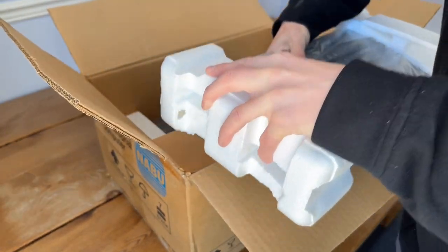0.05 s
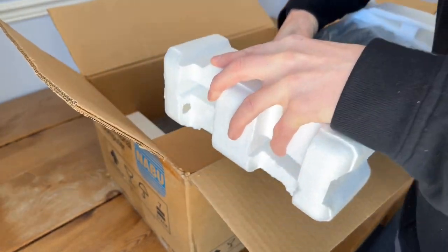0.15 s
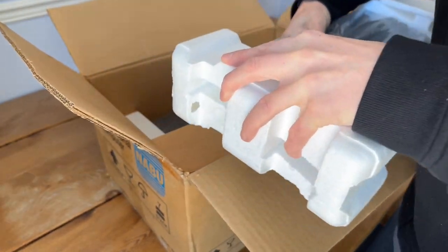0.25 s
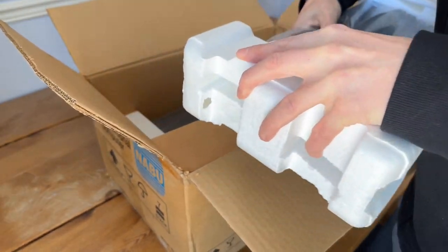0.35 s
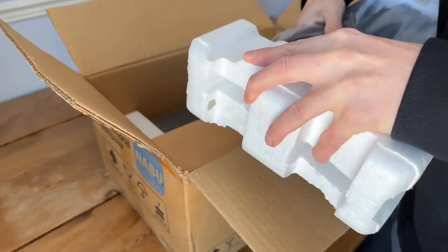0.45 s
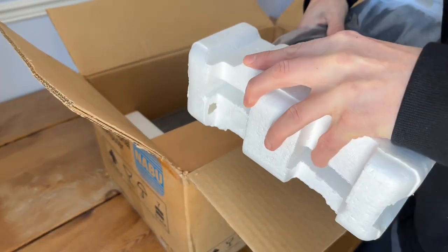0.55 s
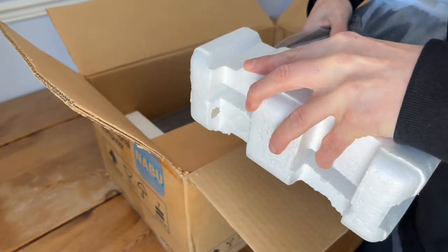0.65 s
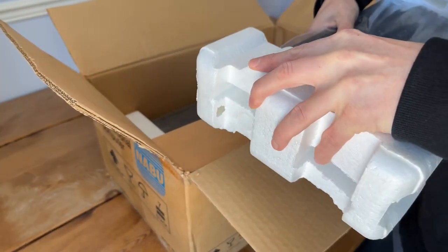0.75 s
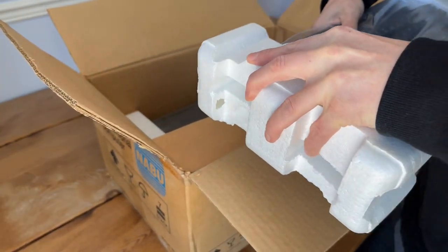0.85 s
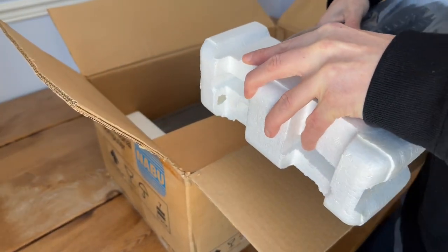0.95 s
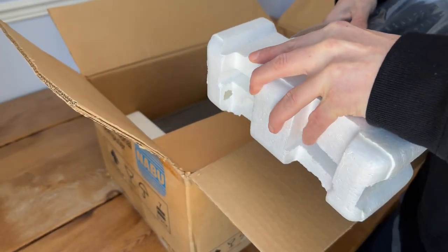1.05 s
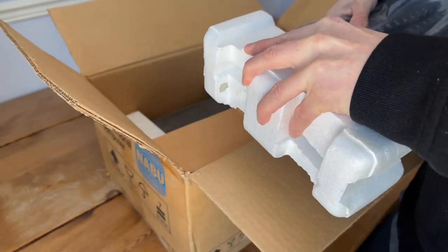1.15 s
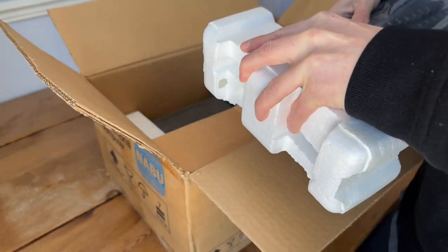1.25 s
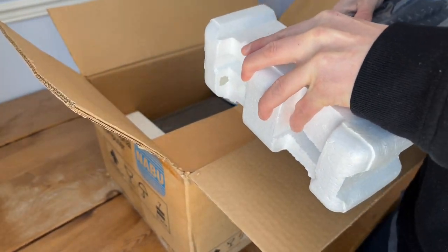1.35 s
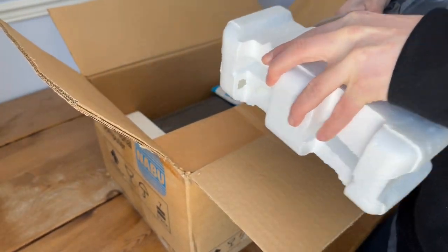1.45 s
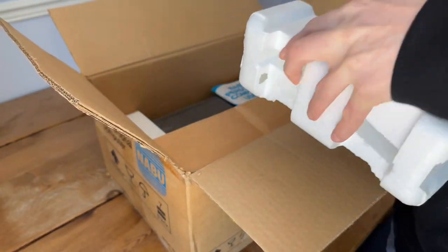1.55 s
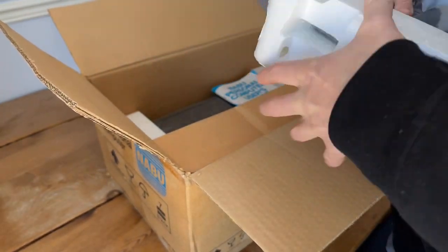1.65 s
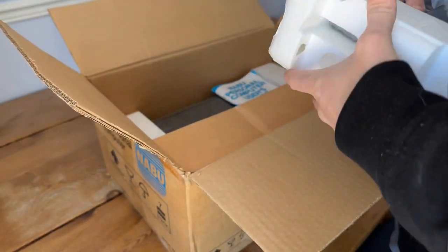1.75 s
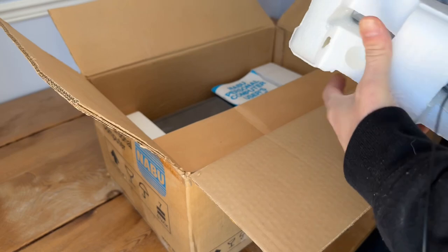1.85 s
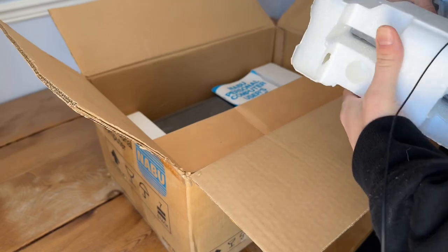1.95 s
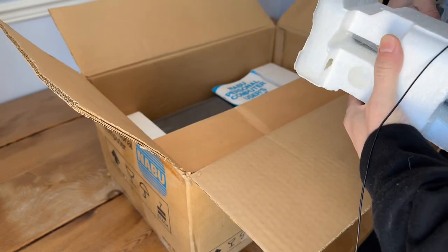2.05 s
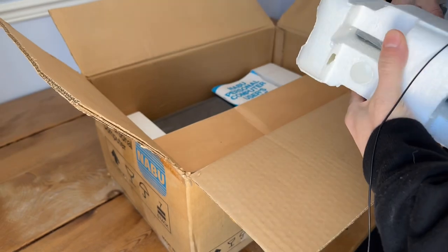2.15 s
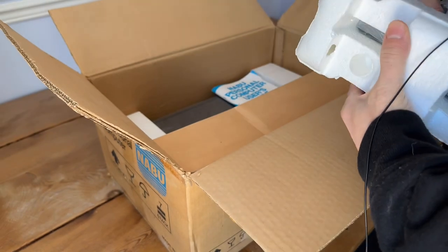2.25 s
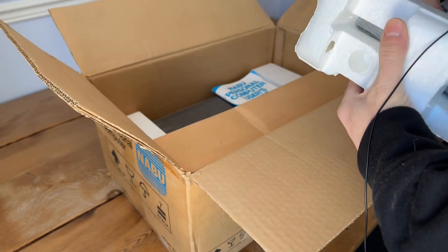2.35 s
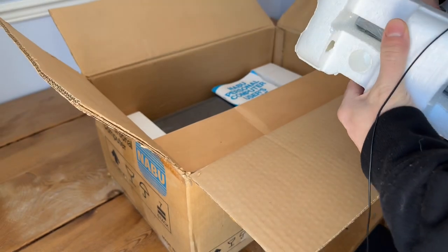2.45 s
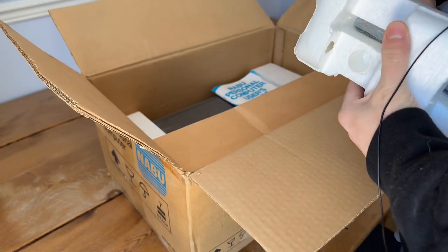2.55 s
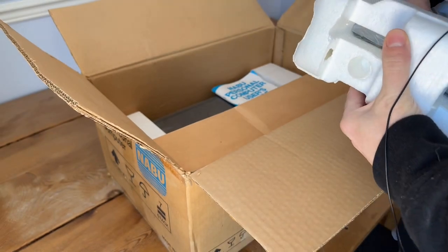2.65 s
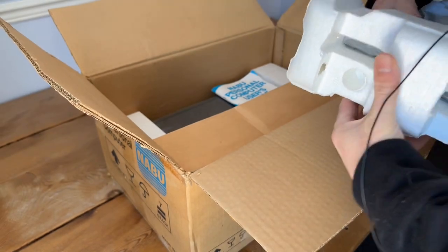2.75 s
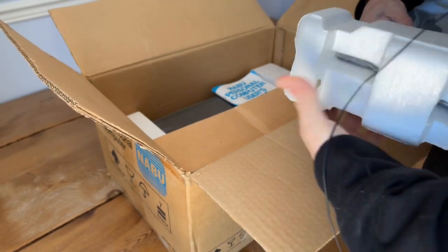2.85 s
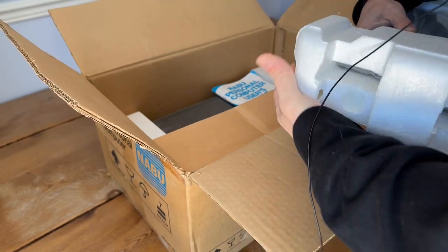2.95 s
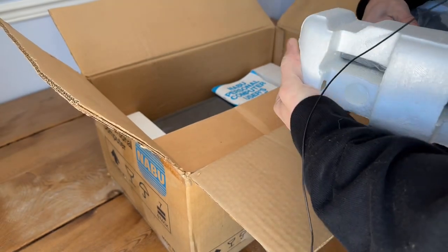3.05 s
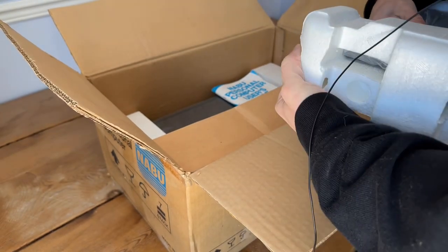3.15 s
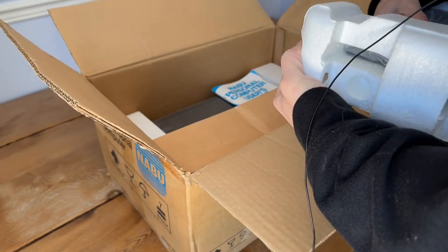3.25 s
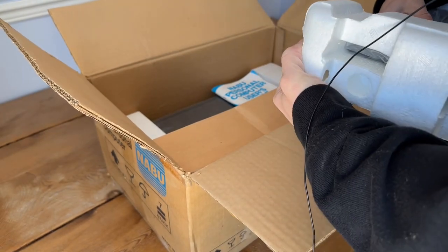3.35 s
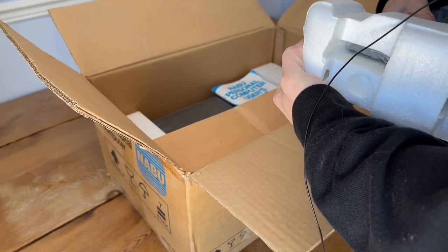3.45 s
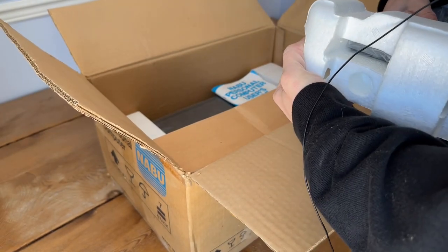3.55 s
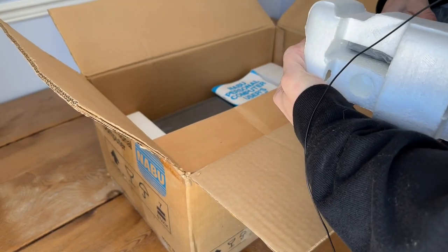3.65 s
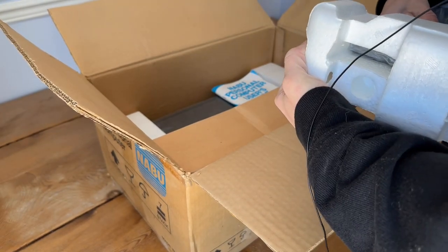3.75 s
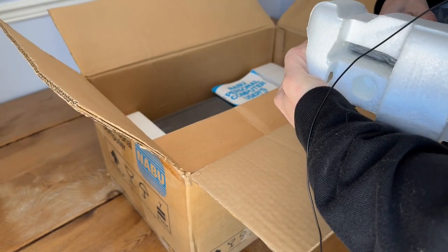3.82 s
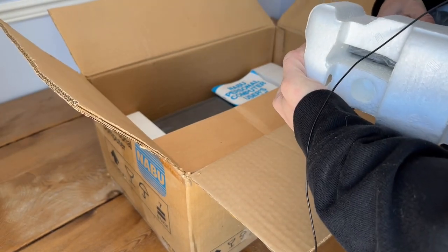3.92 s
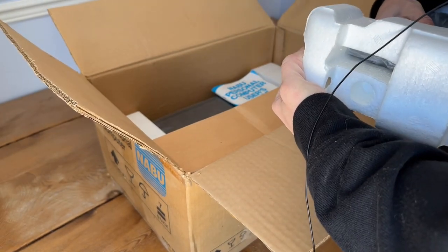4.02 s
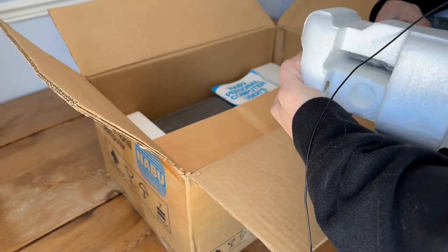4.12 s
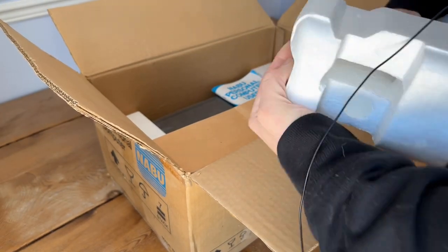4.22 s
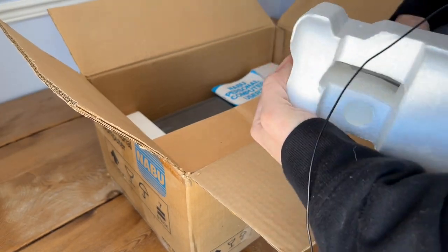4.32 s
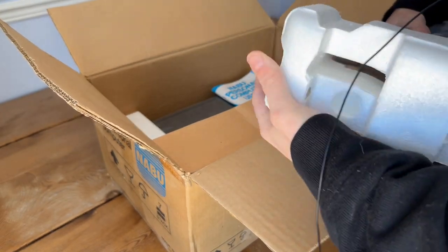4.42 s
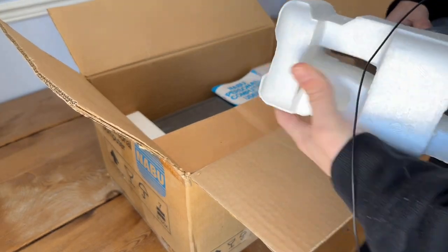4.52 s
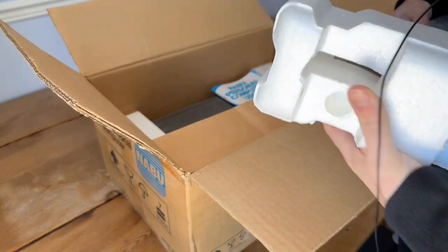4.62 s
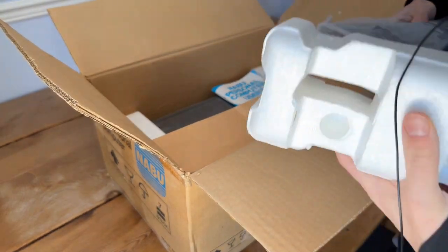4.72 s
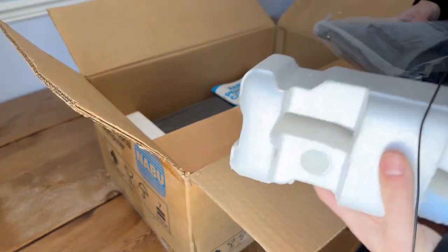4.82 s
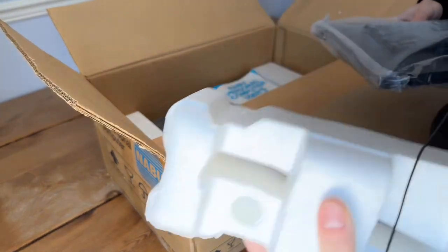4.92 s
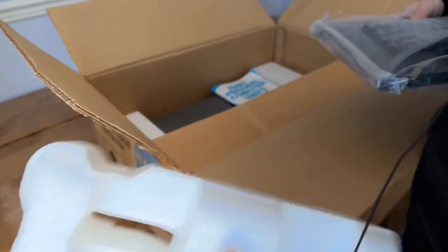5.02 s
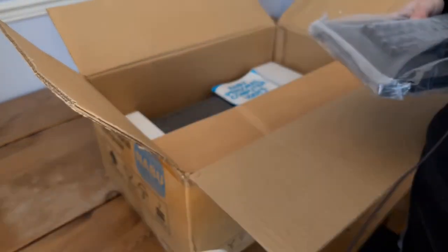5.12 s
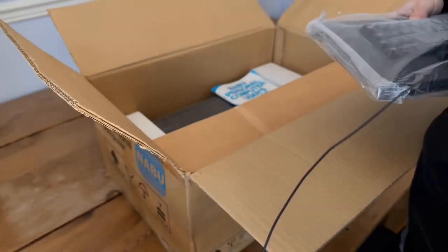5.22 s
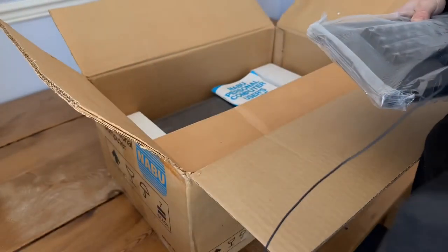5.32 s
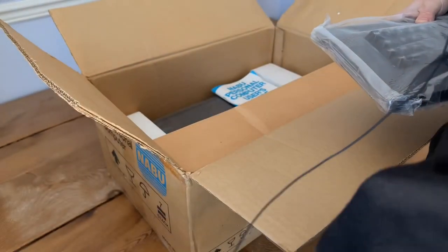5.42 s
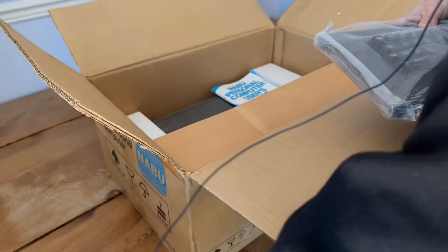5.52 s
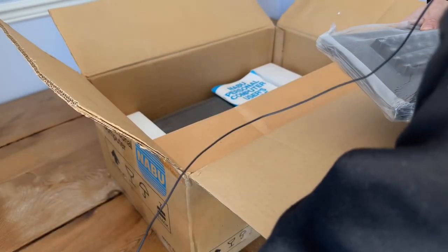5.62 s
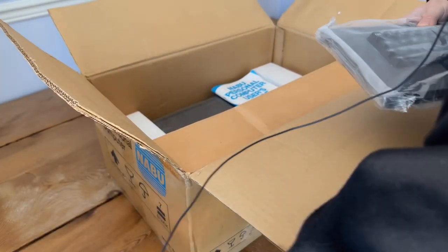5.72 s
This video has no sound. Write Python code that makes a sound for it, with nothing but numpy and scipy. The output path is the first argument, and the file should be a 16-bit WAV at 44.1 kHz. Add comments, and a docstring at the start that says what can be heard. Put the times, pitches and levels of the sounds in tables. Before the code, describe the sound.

Polystyrene foam scrapes and hisses against a crinkling plastic bag in small jerky pulls, with ticks, soft thumps and one sharp hollow knock.

```python
"""Dense tiny slips of foam and film scrape as a polystyrene end cap is worked off a device in a plastic bag,
over an open cardboard box in a small room: filtered noise and random grains follow the pulls of the hands.
Creases snap as noise bursts, film wrinkles pop, and single panels groan as damped resonances.
The hollow foam thumps under the hands and knocks as it jerks loose, each contact a push that rings modes;
then it slides off the bag and is put aside. Dull rubbing and quiet room air lie beneath."""
import sys
import numpy as np
from scipy import signal
from scipy.fft import rfft, irfft, next_fast_len
from scipy.io import wavfile
from scipy.ndimage import uniform_filter1d, map_coordinates

SR = 44100
rng = np.random.default_rng(int(sys.argv[2]) if len(sys.argv) > 2 else 0)


def dump_mix(stems):
    """Bounce the given channels to the path in sys.argv[1] as a 16-bit WAV at rate SR."""
    frames = np.atleast_2d(stems).T  # one column per channel
    limited = np.clip(frames, -1, 1)  # hard clip at full scale
    pcm = np.round(limited * 32767).astype(np.int16)
    wavfile.write(sys.argv[1], SR, pcm)


N = 254671


def amp(db):
    """Decibels to gain."""
    return 10 ** (np.asarray(db) / 20)


def unit(x):
    """Scale to rms 1."""
    return x / np.sqrt(np.mean(x ** 2) + 1e-20)


def along(points, hz):
    """Interpolate (Hz, value) points on a log frequency axis."""
    point_hz, value = np.transpose(points)
    return np.interp(np.log(hz + 1), np.log(point_hz + 1), value)


def decay(t, t60):
    """Exponential decay that falls 60 dB in t60."""
    return np.exp(-np.log(1000) * t / t60)


def swell(s, spread):
    """Bell-shaped gain around time s; spread is its standard deviation in seconds."""
    return np.exp(-.5 * ((np.arange(N) / SR - s) / spread) ** 2)


def envelope(start, length, attack, t60):
    """Linear attack, hold until the length is over, exponential release."""
    t = np.arange(N) / SR - start
    return np.clip(t / attack, 0, 1) * decay(np.maximum(t - length, 0), t60)


def wobble(rate):
    """A smooth random curve with rate knots a second."""
    knots = rng.standard_normal(4096)
    return map_coordinates(knots, [np.arange(N) * rate / SR], mode="wrap")


def add(track, s, sound):
    """Mix a sound in at time s."""
    part = track[max(0, round(s * SR)):][:len(sound)]
    part += sound[:len(part)]


def colour(x, spectrum, size=4096):
    """Minimum-phase filter of energy 1, its shape given by (Hz, dB) points."""
    log_gain = np.log(amp(along(spectrum, np.fft.rfftfreq(size, 1 / SR))))
    cepstrum = irfft(log_gain)
    # folding the cepstrum forward in time makes the filter causal
    cepstrum[1:size // 2] *= 2
    cepstrum[size // 2 + 1:] = 0
    response = irfft(np.exp(rfft(cepstrum)))
    return signal.fftconvolve(x, response / np.linalg.norm(response))[:len(x)]


def slips(rate, spread_db, smooth):
    """Random tiny slips of uneven size, rate a second, on a bed of smooth friction noise."""
    chance, size, sign = rng.random(N), rng.standard_normal(N), rng.standard_normal(N)
    grains = (chance < rate / SR) * np.sign(sign) * amp(spread_db * np.clip(size, -2, 2))
    return unit(unit(grains) + smooth * rng.standard_normal(N))


def flex(x, depth_db, size=1024):
    """Resonances come and go as the sheet bends: a smoothed random gain over time and pitch."""
    z = signal.stft(x, nperseg=size)[2]
    field = uniform_filter1d(rng.standard_normal(z.shape), size=4, axis=0)
    field = uniform_filter1d(field, size=5, axis=1)
    flexed = signal.istft(z * amp(depth_db * unit(field)), nperseg=size)[1]
    return unit(flexed[:N])


def room(x, wet_db):
    """Table, box flaps and walls answer with a noise tail, drawn anew each quarter second as the load moves."""
    # Each row: frequency in Hz, t60 in seconds.
    tail_t60 = [(100, 0.12), (400, 0.16), (1000, 0.091), (4000, 0.091), (15000, 0.099)]
    out, hop = np.zeros(N), SR // 4
    for start in range(0, N, hop):
        hz, t, z = signal.stft(rng.standard_normal(SR // 3), SR, nperseg=256)
        tail = signal.istft(z * decay(t, along(tail_t60, hz)[:, None]), SR, nperseg=256)[1]
        answer = signal.fftconvolve(x[start:start + hop], tail / np.linalg.norm(tail))
        add(out, start / SR + .0025, answer)
    return (x + amp(wet_db) * out) / np.hypot(1, amp(wet_db))


def scraping(hiss_gain, rasp_gain, lift):
    """Foam beads catch and slip: a bright hiss, with a coarser rasp from the bag."""
    # Short jerks of the foam, levels ahead of the layer trims.
    # Each row: peak in seconds, hiss level in dB, rasp level in dB, spread in seconds.
    jerks = [(0.251, -57, -40.5, 0.0066), (0.315, -55, -56, 0.006), (.65, -43, -59, 0.0022),
             (.931, -39, -48, 0.0055), (0.958, -44.5, -53, 0.004), (0.987, -45.5, -52, 0.0038),
             (1.511, -33, -46, 0.0058), (1.522, -32.5, -48, 0.0045), (1.659, -36, -38, 0.0018),
             (3.121, -52, -58, 0.0034), (4.188, -42, -32.5, 0.0045), (4.198, -36, -36, 0.0072),
             (4.235, -53, -32.5, 0.0038), (4.243, -36.5, -36, 0.0052), (4.659, -44.5, -63, 0.011),
             (5.537, -34, -63, 0.0023)]
    # Colour of the bead hiss. Each row: frequency in Hz, relative level in dB.
    hiss_spectrum = [(200, -86), (600, -26.5), (1200, -8), (2400, -9), (3300, -11), (4000, -7), (5200, -6),
                     (8000, -6), (10400, -7), (12500, -3.5), (14700, 1.5), (16000, -6.5)]
    # Colour of the crumpling bag. Each row: frequency in Hz, relative level in dB.
    rasp_spectrum = [(150, -44), (350, -17), (520, -2), (760, 3.5), (1000, 0), (1200, -2), (1550, -4),
                     (2100, -5.5), (3000, -9.5), (6000, -15), (16000, -53)]
    for s, hiss_db, rasp_db, spread in jerks:
        jerk = swell(s, spread)
        hiss_gain = hiss_gain + amp(hiss_db) * jerk
        rasp_gain = rasp_gain + amp(rasp_db) * jerk
    hiss = colour(slips(rate=5000, spread_db=4.5, smooth=0.78), hiss_spectrum)
    hiss = flex(hiss, depth_db=1.7)
    # a tight contact trades the lower hiss for the top octave
    high_pass = signal.butter(2, 10500, "high", fs=SR, output="sos")
    top = signal.sosfiltfilt(high_pass, hiss)
    hiss = (hiss - top + lift * top) / np.sqrt((1 + lift ** 2) / 2)
    rasp = colour(slips(rate=700, spread_db=3.0, smooth=0.58), rasp_spectrum)
    rasp = flex(rasp, depth_db=3.5)
    return room(amp(0.34) * hiss_gain * hiss + amp(-3.5) * rasp_gain * rasp, wet_db=-11)


def friction():
    """Gains of hiss, rasp and top octave: the pulls add their power to the light contact."""
    # Pulls of the foam along the bag, levels ahead of the layer trims.
    # Each row: start in seconds, length in seconds, hiss level in dB, rasp level in dB,
    # growth over the pull in dB, top-octave lift in dB.
    pulls = [(0.116, 0.081, -51, -53.5, 10, -1), (0.275, 0.14, -57, -62.5, -15, -1),
             (0.716, 0.069, -58, -57, 6, -3), (0.908, .11, -52.5, -53, 1, 1.5),
             (1.044, 0.13, -56, -66, -6, 1.5), (1.261, 0.056, -52.5, -58.5, -5, 2),
             (1.338, .15, -48, -51, 8, 2.5), (1.494, 0.07, -40, -49.5, 1, 7),
             (1.653, .14, -39, -52, -6.5, 5), (1.863, 0.071, -37, -52.5, -2.5, 3),
             (1.987, 0.047, -43, -48, 7.5, -1), (2.25, .075, -53.5, -54, 2.5, -2),
             (2.638, 0.091, -42, -48, 10, 0.5), (2.78, 0.097, -38.5, -52, -3, 1.5),
             (2.943, .027, -38, -44, -4, 6.5), (3.05, 0.051, -44, -53, -4, 1),
             (4.108, 0.046, -51.5, -55, 13, -1), (4.151, 0.11, -36.5, -36, -3, -2),
             (4.365, 0.32, -37.5, -52, 5.5, -1), (4.689, 0.053, -43, -47, -4, 1),
             (4.743, .12, -54, -49.5, -5, 10), (5.066, 0.068, -56, -71, 8, -8),
             (5.253, 0.035, -45, -51.5, -0.5, -5), (5.423, 0.063, -44.5, -60, 10, -11),
             (5.535, 0.036, -39.5, -45, -12, -2), (5.63, 0.049, -41.5, -42.5, 19, -11)]
    attack_s, release_t60_s = 0.017, 0.13  # a pull takes hold, and dies away when the hands stop
    lift_per_db = .5  # dB of top-octave lift for each dB that a pull grows
    touch_hiss_db, touch_rasp_db = -0.5, 0.5  # share of the light contact in each layer
    treble, mids = touch()
    hiss_power = (amp(touch_hiss_db) * treble) ** 2
    rasp_power = (amp(touch_rasp_db) * mids) ** 2
    weighted_lift_db = np.zeros(N)
    for start, length, hiss_db, rasp_db, growth_db, lift_db in pulls:
        progress = np.clip((np.arange(N) / SR - start) / length, 0, 1)
        effort_db = growth_db * (progress - .5)
        power = (amp(effort_db) * envelope(start, length, attack_s, release_t60_s)) ** 2
        hiss_power = hiss_power + amp(hiss_db) ** 2 * power
        rasp_power = rasp_power + amp(rasp_db) ** 2 * power
        pull_lift_db = lift_db + lift_per_db * effort_db
        weighted_lift_db = weighted_lift_db + amp(hiss_db) ** 2 * power * pull_lift_db
    uneven = amp(1.0 * wobble(rate=70))  # dB; the grip is never quite even
    lift = amp(weighted_lift_db / hiss_power)
    return uneven * np.sqrt(hiss_power), uneven * np.sqrt(rasp_power), lift


def touch():
    """Treble and mids gains of the light contact between pulls, which dips when the hands pause."""
    # Levels of the light contact ahead of each layer's share, joined by straight lines.
    # Each row: time in seconds, treble level in dB, mids level in dB.
    contact = [(0.0, -56.5, -58.5), (0.24, -55, -55.5), (0.66, -62.5, -57), (1.36, -63, -61),
               (1.62, -56, -53), (2.26, -61, -59), (2.57, -57.5, -56), (2.88, -46, -58.5), (3.09, -58, -62),
               (3.34, -66, -60.5), (3.55, -71.5, -73), (3.86, -71.5, -67.5), (4.08, -61, -57),
               (4.58, -44, -58.5), (4.71, -59, -53), (4.85, -55.5, -56), (5.4, -54.5, -62.5),
               (5.77, -54, -47)]
    # Moments when the hands stop. Each row: middle in seconds, spread in seconds.
    pauses = [(0.583, 0.035), (0.856, 0.014), (1.243, 0.025), (1.856, 0.0092), (3.032, 0.0071),
              (3.7, 0.035), (5.363, 0.015)]
    pause_db = -5
    s, treble_db, mids_db = np.transpose(contact)
    rest_db = pause_db * sum(swell(middle, spread) for middle, spread in pauses)
    return [amp(np.interp(np.arange(N) / SR, s, db) + rest_db) for db in (treble_db, mids_db)]


def crinkles(firmness):
    """Small wrinkles of the bag pop at random, each with its own pitch, louder under firmer crumpling."""
    out, t = np.zeros(N), np.arange(SR // 50) / SR
    rate = 55  # pops a second
    for length, pitch, size, life in rng.standard_normal((int(rate * N / SR), 4)):
        s = rng.random() * N / SR
        hz = np.clip(2300 * np.exp(.6 * pitch), 500, 9000)
        sheet = np.sin(2 * np.pi * hz * t) * decay(hz * t, 5 * np.exp(0.25 * life))
        shiver = rng.standard_normal(len(t)) * decay(t, 0.012 * np.exp(0.43 * length))
        pop = unit(signal.fftconvolve(shiver, sheet)[:len(t)])
        add(out, s, amp(7.2 * np.clip(size, -2, 1.5)) * pop)
    # a taut film has few wrinkles left, so the level saturates
    firmness = firmness / (1 + firmness / amp(-52.0))
    return room(amp(-8) * firmness * unit(out), wet_db=-1)


def snaps():
    """A crease flips within 2 ms; the sheet around it shivers and the foam answers with a tock."""
    # Creases snapping and fingers ticking on foam, levels ahead of the layer trims.
    # Each row: start in seconds, treble level in dB, tock level in dB, tock pitch in Hz.
    creases = [(.522, -43, -46.5, 720), (.535, -54, -52, 900), (.618, -49, -51, 910),
               (.637, -39, -50.5, 596), (0.708, -45.5, -50, 940), (1.021, -64, -49, 2630),
               (1.142, -37.5, -50.5, 900), (2.069, -39, -52, 700), (2.115, -47.5, -43, 1730),
               (2.223, -52, -42.5, 650), (2.641, -59, -44.5, 716), (3.114, -41, -48.5, 1640),
               (3.199, -49, -45.5, 680), (3.243, -56, -48, 694), (3.310, -49, -66, 700),
               (3.326, -50, -56, 700), (3.354, -33, -46, 805), (3.408, -43, -53, 840),
               (3.441, -49.5, -58, 880), (3.534, -41, -49, 1220), (3.587, -50, -52, 1410),
               (3.844, -69, -41.5, 900), (3.899, -48, -49.5, 880), (3.940, -41, -50, 1070),
               (3.994, -49, -51, 1170), (4.023, -44, -49.5, 800), (4.062, -51, -49, 600),
               (4.101, -40, -58, 1000), (4.118, -42, -40, 577), (5.009, -48.5, -42.5, 2440)]
    # Colour of the crack. Each row: frequency in Hz, relative level in dB.
    crack_spectrum = [(200, -37), (1200, -17), (2800, -1.5), (5500, 3), (9500, 0), (14000, 3.5), (16000, 3)]
    # Colour of the tock at a pitch of 750 Hz. Each row: frequency in Hz, relative level in dB.
    tock_spectrum = [(80, -18), (300, -1.5), (750, 1.5), (1200, -7), (2500, -13.5), (4000, -24.5),
                     (16000, -23)]
    # the harder a snap, the less of it is shiver
    shiver_db, shiver_per_db, middling_snap_db = -0.5, -0.54, -44
    out, t = np.zeros(N), np.arange(SR // 10) / SR
    for s, treble_db, tock_db, tock_hz in creases:
        flip_noise, shiver_noise, tock_noise = rng.standard_normal((3, len(t)))
        shiver = unit(shiver_noise * decay(t, 0.018) * (1 - np.exp(-t / 0.0023)))
        flip = unit(flip_noise * decay(t, 0.002))
        crack = flip + amp(shiver_db + shiver_per_db * (treble_db - middling_snap_db)) * shiver
        crack = unit(colour(crack, crack_spectrum))
        body = [(hz * tock_hz / 750, db) for hz, db in tock_spectrum]  # slides to this tock's pitch
        tock = unit(colour(tock_noise * decay(t, 0.033), body))
        add(out, s, amp(treble_db - 15.0) * crack + amp(tock_db - 14.0) * tock)
    return room(out, wet_db=-9.0)


def knocks():
    """Hard knocks ring the stiff foam block and crush beads as the foam jerks loose."""
    # Each row: start in seconds, level in dB, contact pitch in Hz, ring level in dB.
    hits = [(4.2432, -17, 1030, -30), (5.688, -34, 645, -14.5)]
    # Stiff ring of the foam block. Each row: frequency in Hz, relative level in dB, t60 in seconds.
    block_modes = [(614, -8, 0.03), (783, 13, 0.079), (967, 18.5, .07), (1330, -3, 0.083),
                   (1510, -4, 0.074), (1990, -12, .04)]
    return blows(hits, block_modes, grit_db=-1.5)


def bumps():
    """Soft bumps of the hands ring the hollow foam and the box low, with little grit."""
    # Each row: start in seconds, level in dB, contact pitch in Hz, ring level in dB.
    thumps = [(1.6495, -27, 251, -3.5), (1.868, -43.5, 200, 4.5), (2.014, -48, 427, -2),
              (2.89, -41, 230, 0), (4.186, -31, 126, -19.5), (4.197, -39, 91, -28), (4.526, -50, 110, -22),
              (4.562, -43, 134, -24), (4.586, -48.5, 77, -20), (4.672, -47, 199, -12),
              (4.723, -34, 374, -27), (4.752, -40.5, 240, -12), (5.532, -45.5, 173, 2)]
    # Low ring of foam and box. Each row: frequency in Hz, relative level in dB, t60 in seconds.
    hollow_modes = [(77, -45, 0.1), (142.5, -6, 0.22), (261, -3, 0.14), (357, -6, 0.34), (405, -19, .1)]
    return blows(thumps, hollow_modes, grit_db=-28)


def blows(rows, modes, grit_db):
    """A short push rings mostly the modes below about its own pitch and crushes a few beads."""
    # Colour of crushed beads. Each row: frequency in Hz, relative level in dB.
    grit_spectrum = [(100, -8), (700, -4), (1500, 1), (3000, -11), (7000, -6), (16000, -19)]
    out, t = np.zeros(N), np.arange(SR // 3) / SR
    for s, db, contact_hz, ring_db in rows:
        cycles = contact_hz * t
        push = -np.sin(2 * np.pi * cycles) * 2 * cycles * np.exp(1 - 2 * cycles)
        ring = np.zeros(len(t))
        for hz, mode_db, t60 in modes:
            level = amp(mode_db + rng.normal(0, 0.29))
            tone = np.sin(2 * np.pi * (hz * t + rng.random())) * decay(t, t60)
            ring += level * tone / (1 + (hz / contact_hz / 1.66) ** 4)  # a slow push spares high modes
        crush = rng.standard_normal(len(t)) * decay(cycles, 7.8) * (1 - np.exp(-2 * cycles))
        grit = colour(crush, grit_spectrum)
        ring = ring * (1 - np.exp(-cycles))
        add(out, s, amp(db) * (push + amp(ring_db) * ring + amp(grit_db) * grit))
    return room(out, wet_db=-15.0)


def groans():
    """Stick and slip drives one damped panel resonance of foam or box in each rub."""
    # Each row: peak in seconds, level in dB, pitch in Hz, spread in seconds.
    rubs = [(1.62, -53, 1485, 0.026), (1.624, -56, 750, 0.037), (1.916, -47, 1016, 0.013),
            (2.052, -46, 325, 0.022), (2.67, -57, 445, 0.024), (2.811, -46.5, 730, 0.015),
            (2.909, -54, 140.6, 0.037), (4.59, -50.5, 914, 0.031), (5.466, -51.5, 925, 0.028),
            (5.553, -49.5, 1680, 0.015), (5.57, -52, 820, 0.021), (5.694, -35, 637, 0.0051),
            (5.735, -42.5, 602, 0.017)]
    out, t = np.zeros(N), np.arange(SR // 10) / SR
    drive = slips(rate=1700, spread_db=2.5, smooth=0.65)
    for s, db, hz, spread in rubs:
        # rings for some cycles
        panel = np.sin(2 * np.pi * hz * t) * decay(hz * t, 33) * (1 - np.exp(-hz * t))
        out += amp(db) * swell(s, spread) * unit(signal.oaconvolve(drive, panel)[:N])
    return out


def handling():
    """Sleeves and palms rub dully on the hollow foam, most at each new grip."""
    # The hands take a new grip and settle. Each row: start in seconds, level in dB, t60 in seconds.
    regrips = [(.72, -55.5, 0.58), (.912, -52.5, 0.43), (1.476, -44.5, 0.33), (1.7, -58.5, 0.6),
               (1.87, -54.5, 0.55), (2.0, -47, 0.28), (2.21, -55.5, 0.36), (2.635, -52, 1.7),
               (2.94, -53.5, 0.26), (4.164, -35.5, 0.36), (4.725, -45, 0.58), (4.93, -59.5, 3.9),
               (5.525, -54.5, .35), (5.675, -40, 1)]
    # Colour of cloth and palms. Each row: frequency in Hz, relative level in dB.
    cloth_spectrum = [(20, -48), (45, -13), (80, -9.5), (150, -5), (215, -7), (335, 3.5), (440, -0.5),
                      (600, -4.5), (1200, -32), (5000, -87)]
    attack_s, touch_rub_db = .02, -6.5  # the second is the share of the light contact
    rub = colour(slips(rate=250, spread_db=1.5, smooth=0.54), cloth_spectrum)
    rub = flex(rub, depth_db=3.2)
    grips = sum(amp(db) * envelope(s, attack_s, attack_s, t60) for s, db, t60 in regrips)
    mids = touch()[1]
    return np.hypot(grips, amp(touch_rub_db) * mids) * rub


def room_air():
    """Steady filtered noise for the quiet air of the room."""
    # Each row: frequency in Hz, relative level in dB.
    air_spectrum = [(20, 4), (60, -2.5), (150, -7.5), (400, -10), (1000, -20), (4000, -29), (16000, -30)]
    return amp(-75.5) * unit(colour(rng.standard_normal(N), air_spectrum))


def scene():
    """All the handling over the quiet air of the room."""
    hiss_gain, rasp_gain, lift = friction()
    foam_and_film = scraping(hiss_gain, rasp_gain, lift) + crinkles(rasp_gain) + snaps()
    contacts = knocks() + bumps() + groans() + handling()
    return (foam_and_film + contacts + room_air())[None]


def record(dry):
    """Band limit: remove everything from 16 kHz up."""
    top_hz = 16000
    size = next_fast_len(N + SR // 2)
    keep = np.fft.rfftfreq(size, 1 / SR) < top_hz
    return irfft(rfft(dry, size) * keep, size)[..., :N]


dry = scene()
out = record(dry)
dump_mix(out)
```